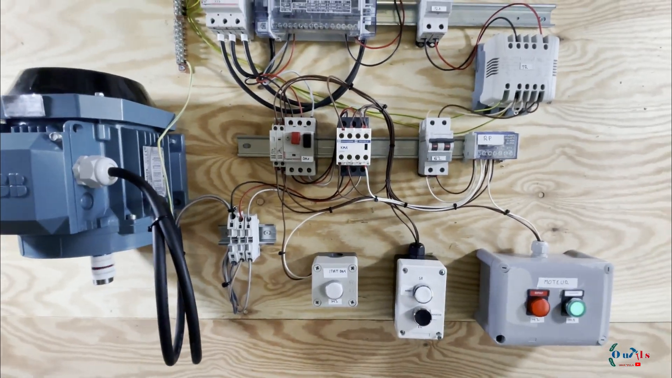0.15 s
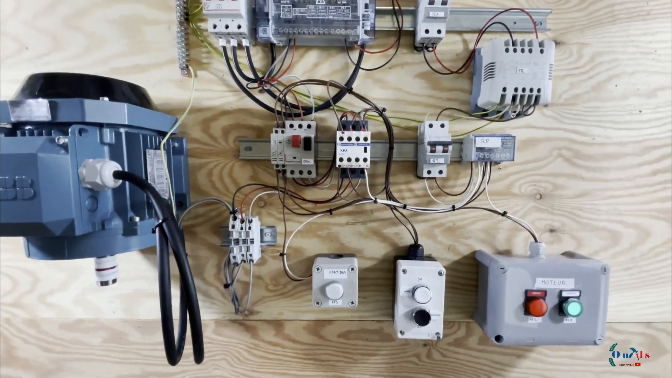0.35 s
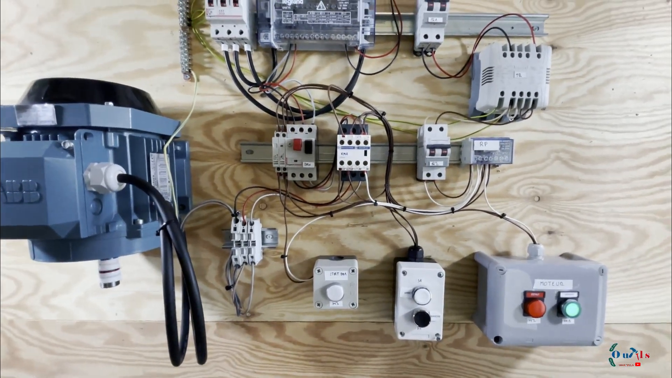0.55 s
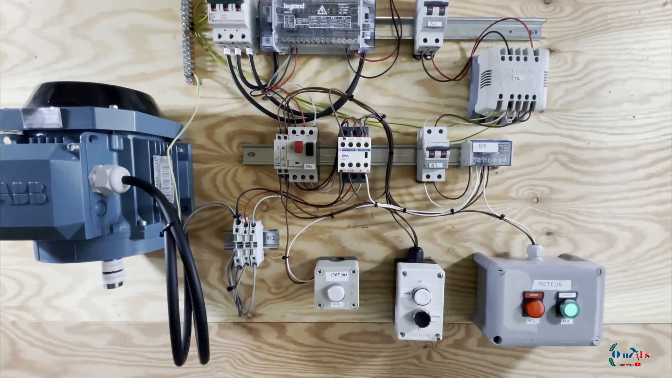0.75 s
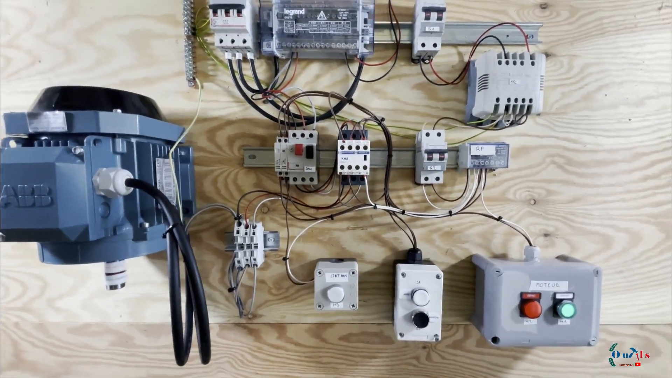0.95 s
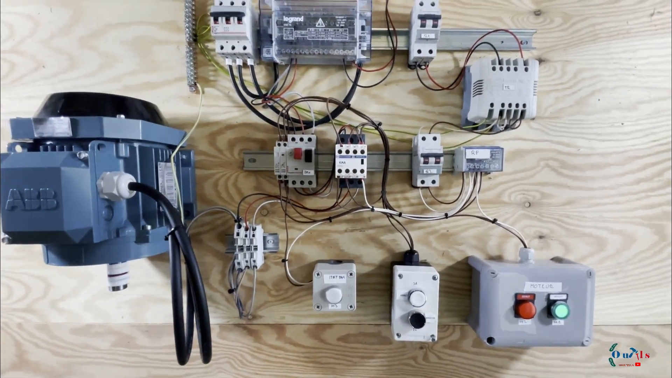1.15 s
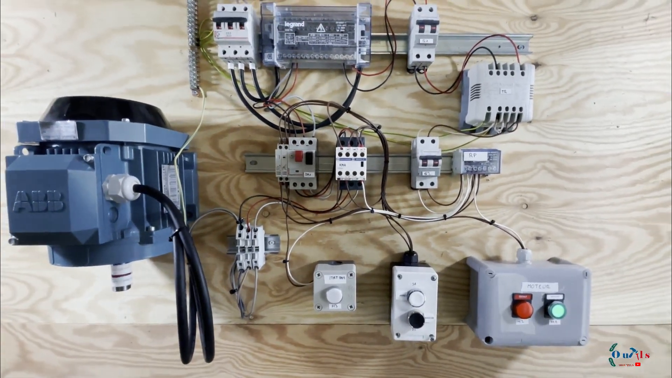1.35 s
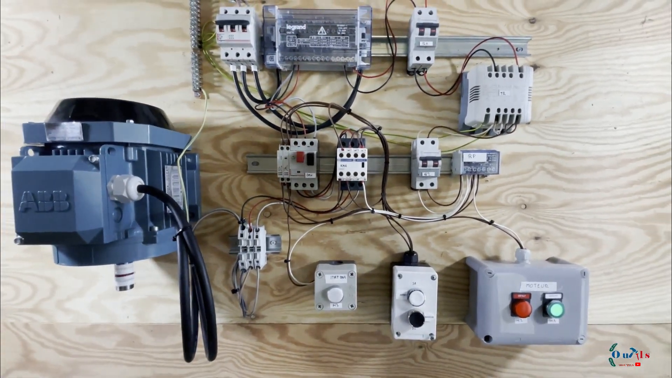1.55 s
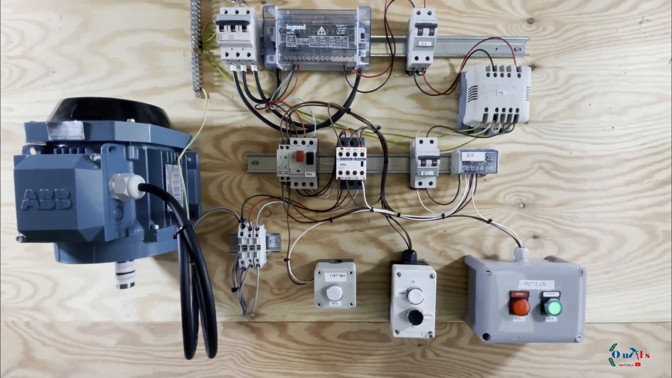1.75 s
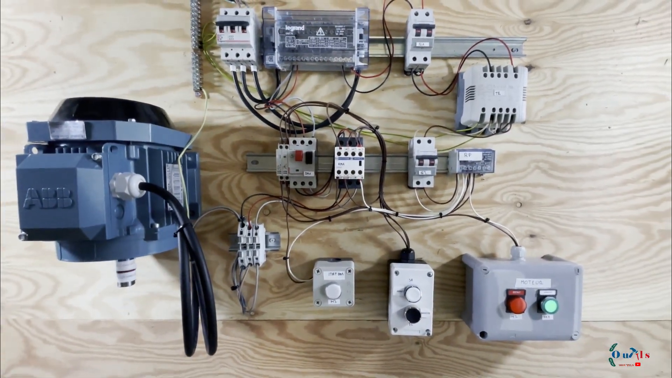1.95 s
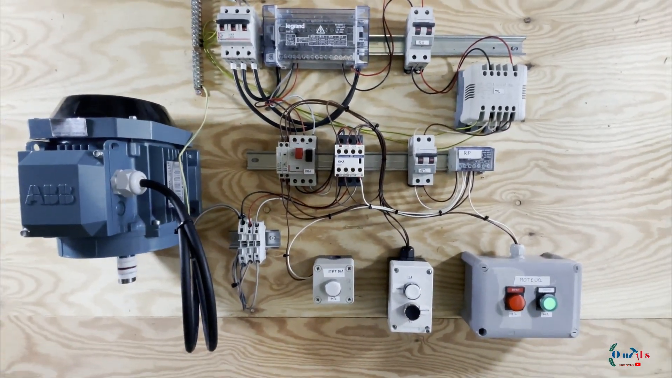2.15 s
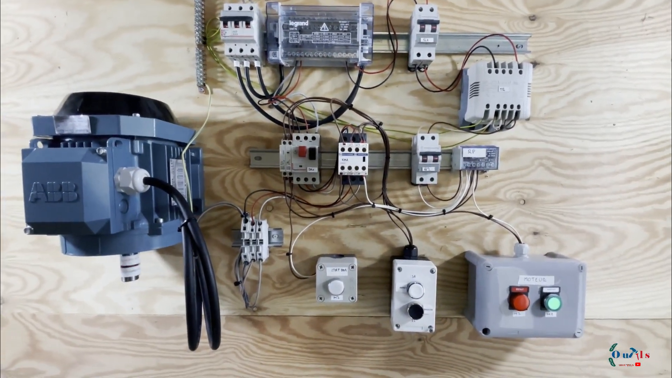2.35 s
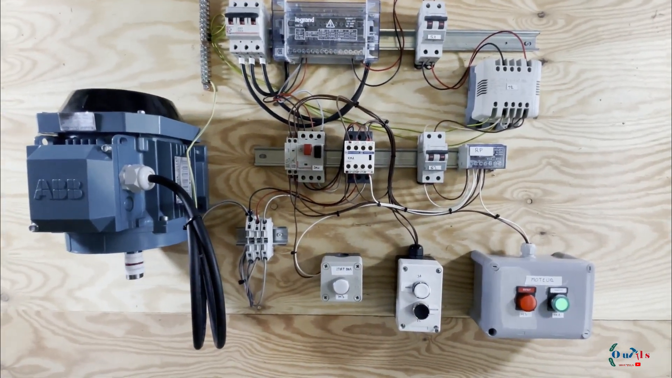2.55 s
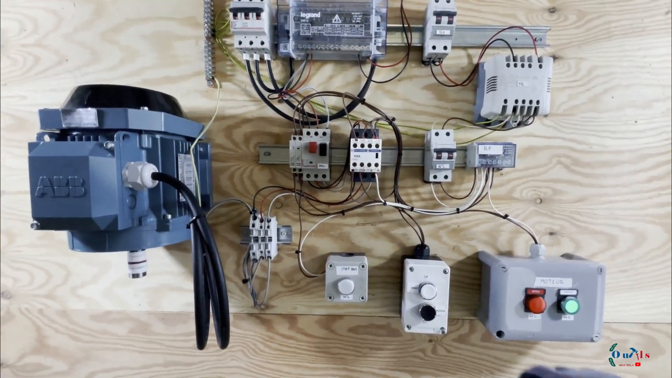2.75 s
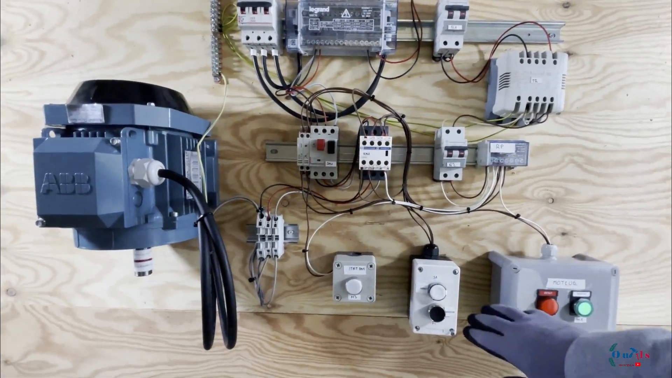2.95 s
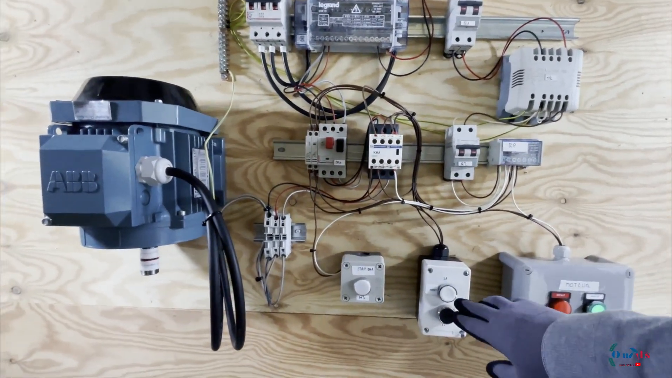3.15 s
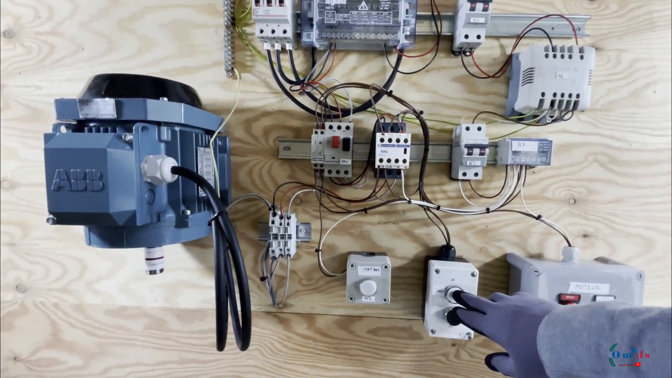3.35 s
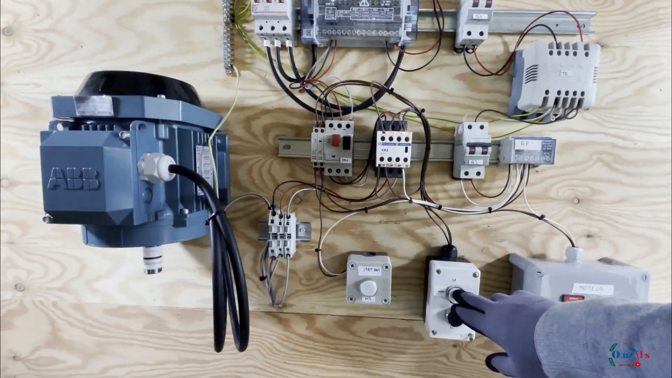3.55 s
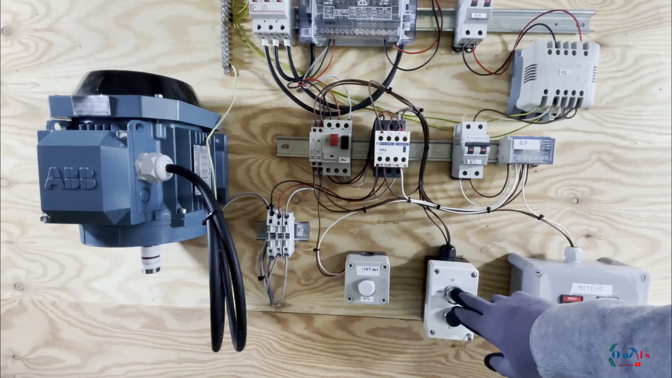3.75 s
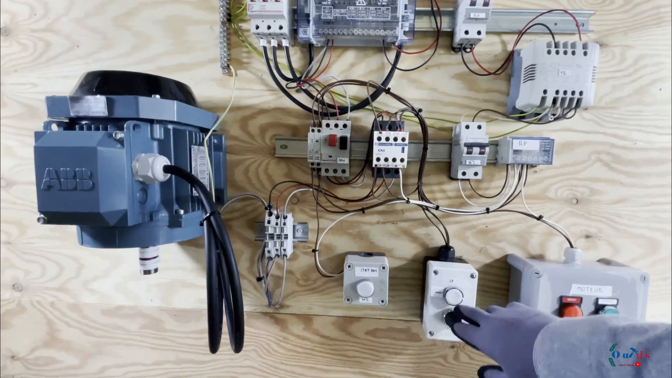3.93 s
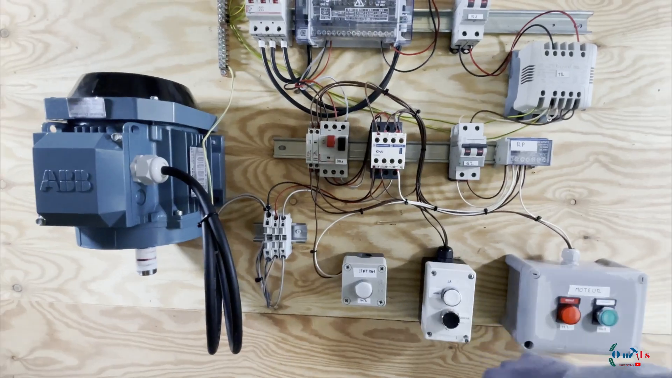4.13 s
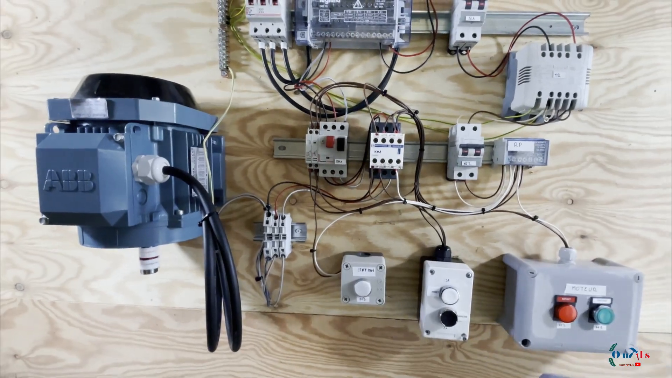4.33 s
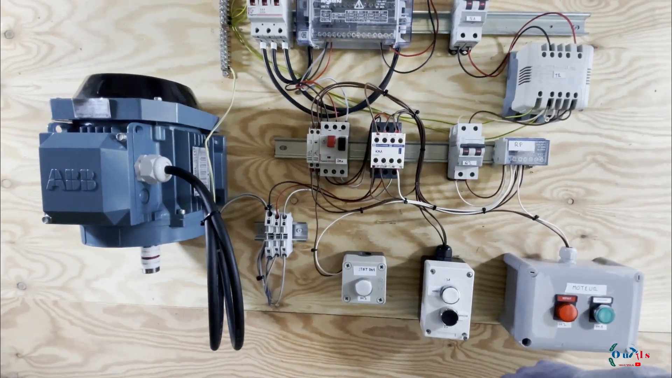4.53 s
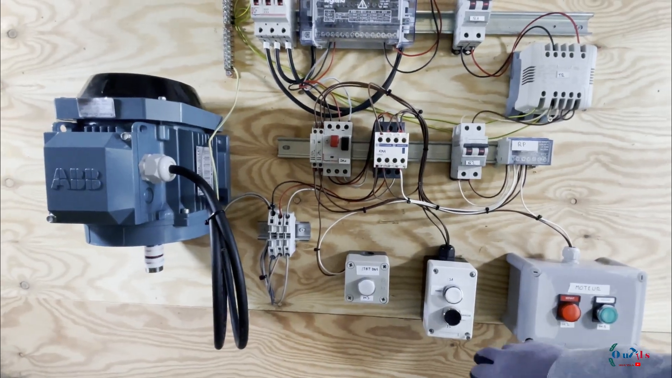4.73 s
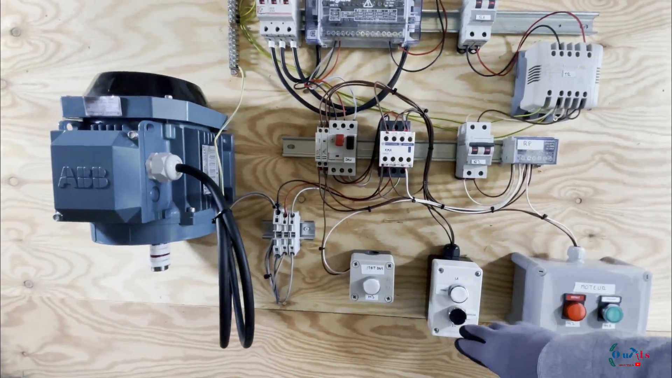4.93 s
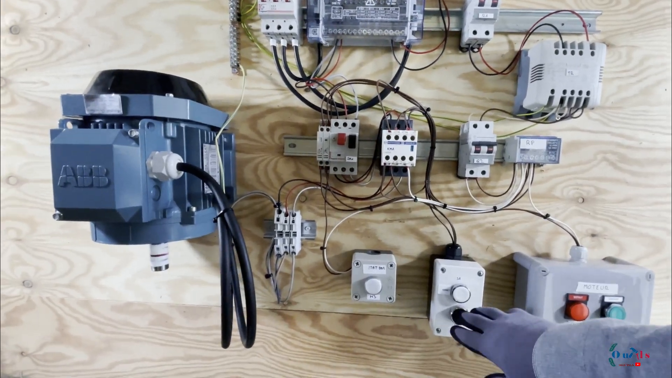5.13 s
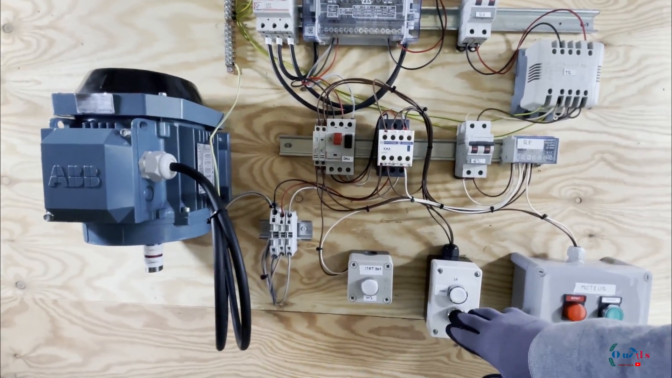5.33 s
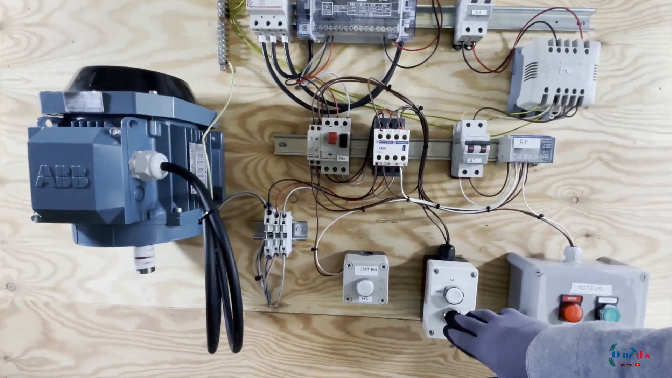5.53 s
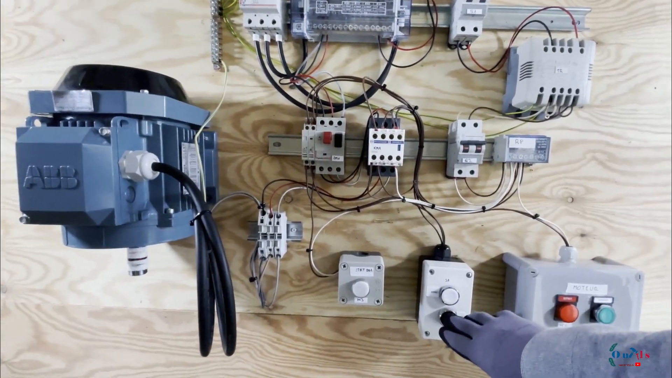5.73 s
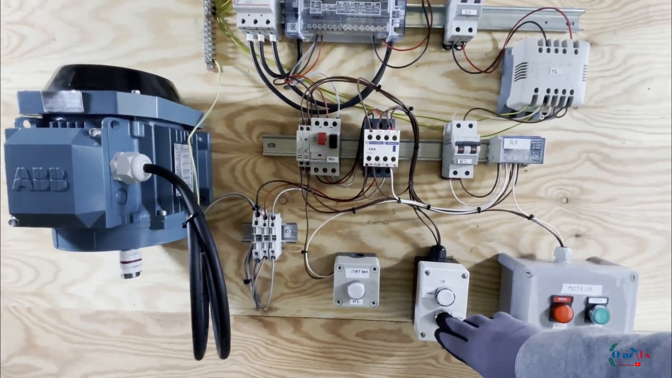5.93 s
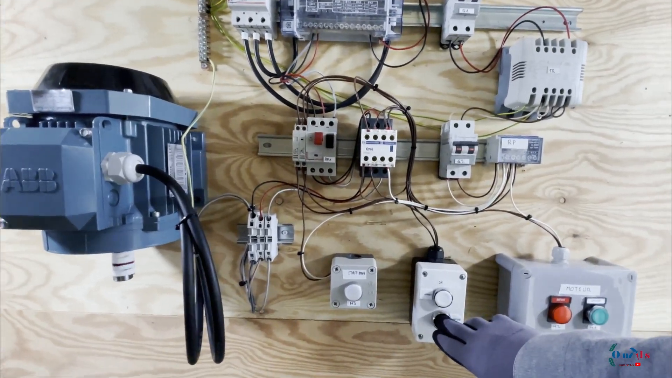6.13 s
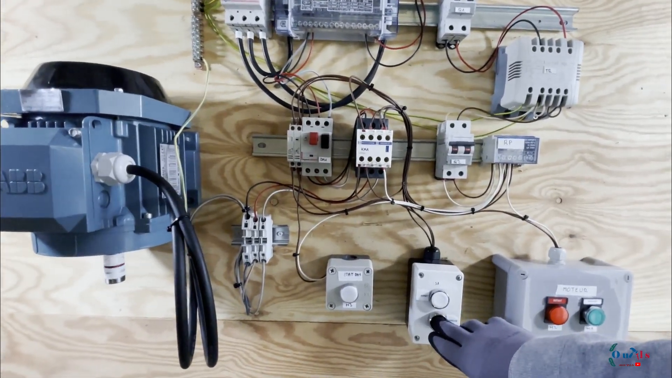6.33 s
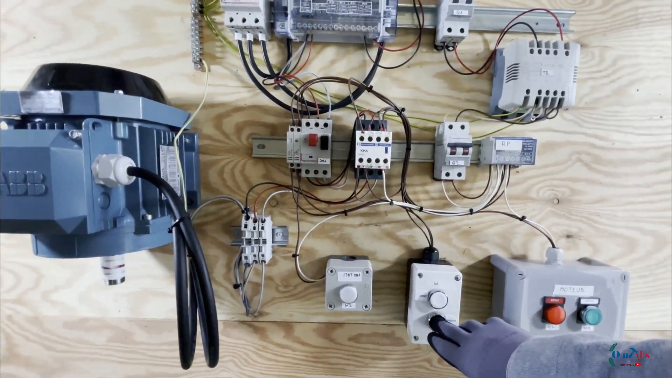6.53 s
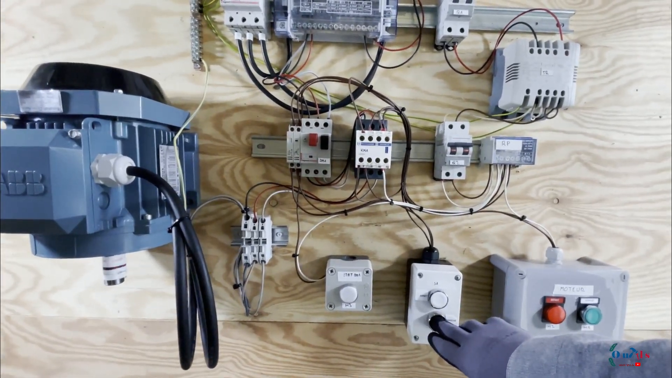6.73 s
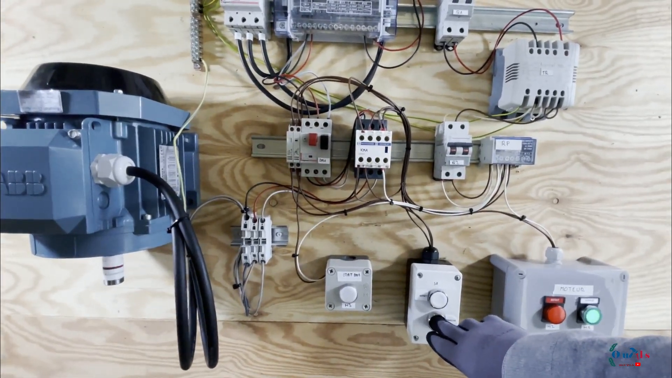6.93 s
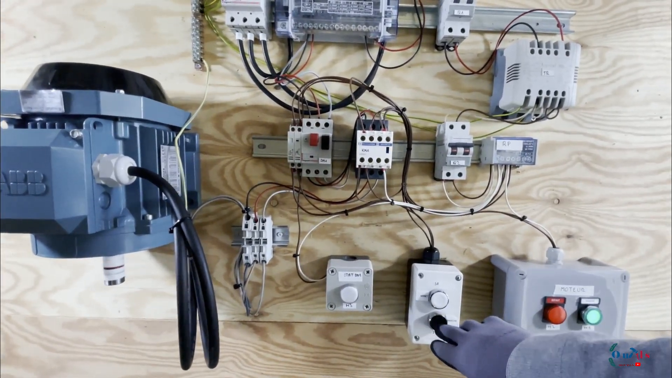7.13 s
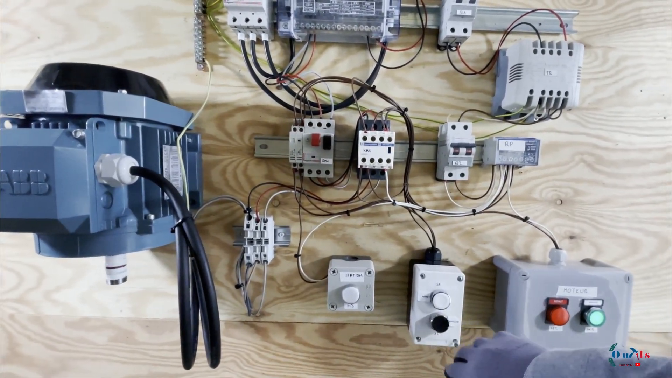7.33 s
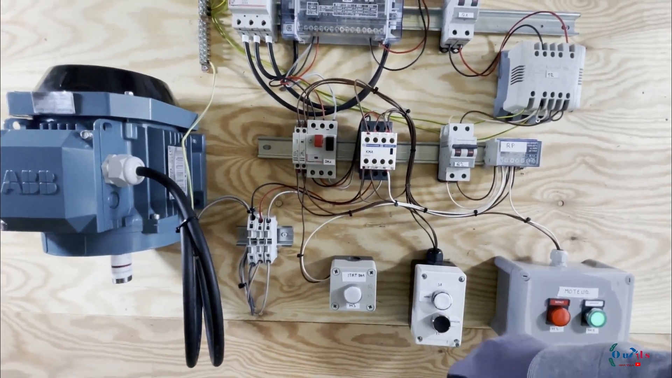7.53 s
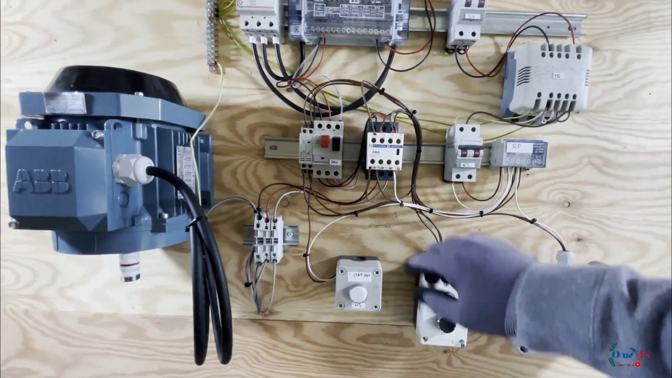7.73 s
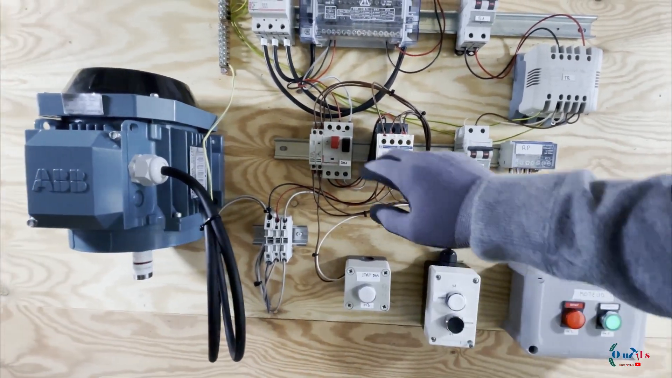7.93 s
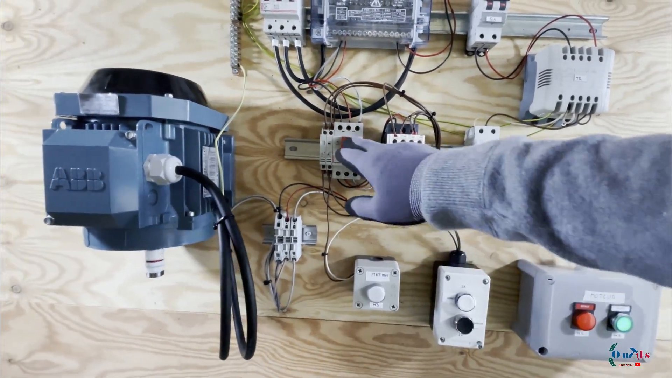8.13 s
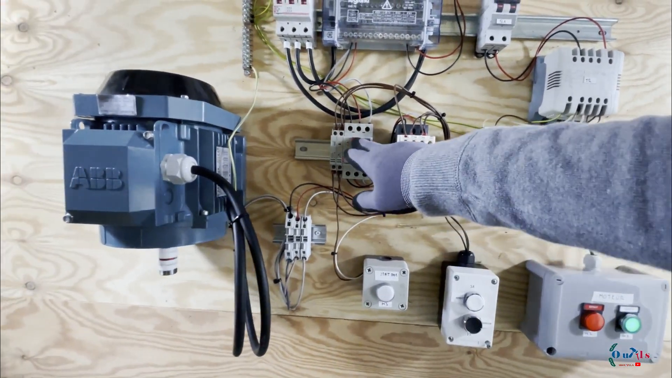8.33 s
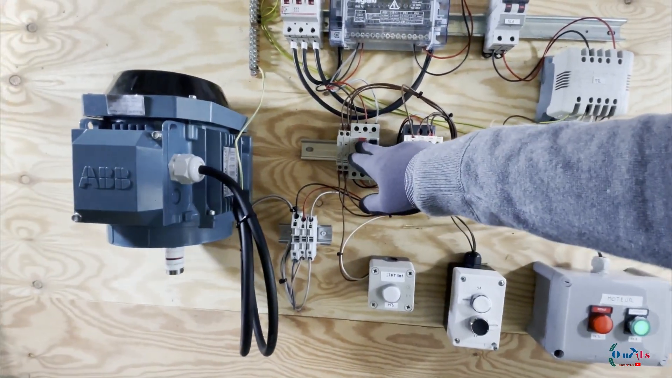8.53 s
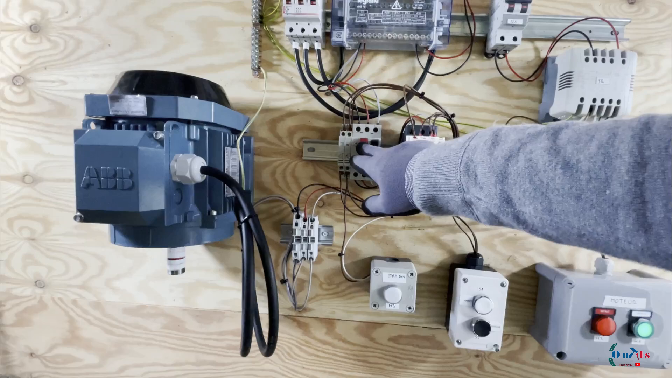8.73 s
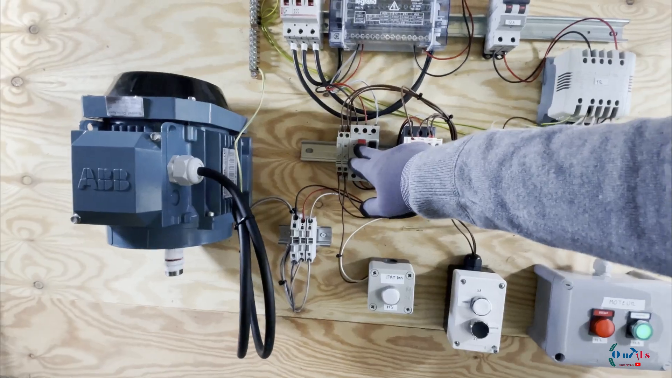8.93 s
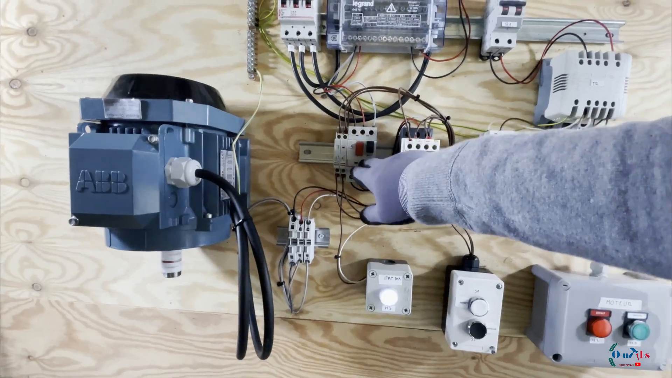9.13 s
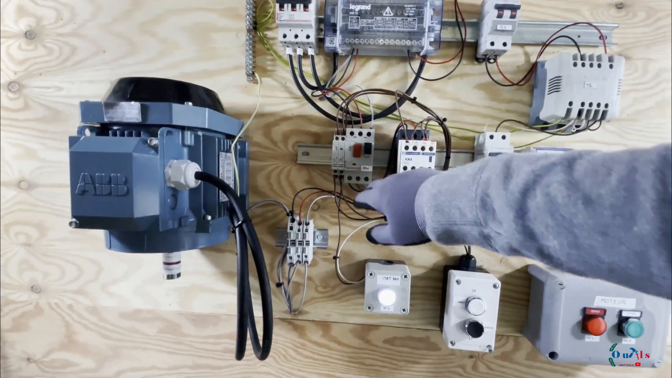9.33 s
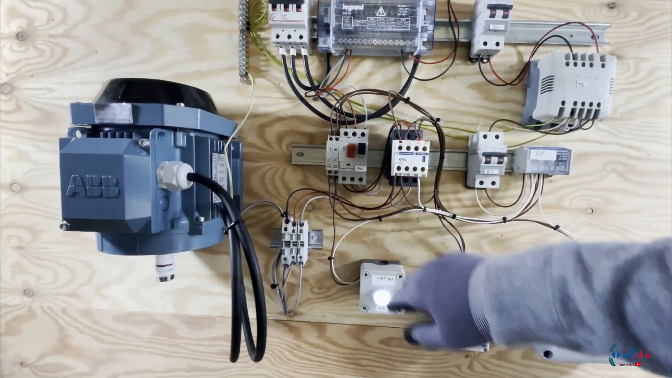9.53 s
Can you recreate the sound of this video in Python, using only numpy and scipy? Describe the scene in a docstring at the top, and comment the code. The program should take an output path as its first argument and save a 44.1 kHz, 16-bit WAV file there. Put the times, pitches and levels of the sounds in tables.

```python
"""A four-pole induction motor runs on a plywood board, left of a two-port microphone held above it.
Mains and rotor slots sing while current flows, over the fan, the bearings and the shaking board.
At 3.7 s a contactor drops out and the workshop rings; the field collapses and the rotor coasts down.
Buttons tick and a sleeve brushes past. At 7 s the contactor closes, and the torque pulls the rotor
back to speed with a shudder that knocks the motor's feet. At 9.1 s the contactor drops out again."""
import sys
import numpy as np
from scipy import signal
from scipy.fft import rfft, irfft, next_fast_len
from scipy.io import wavfile
from scipy.ndimage import uniform_filter1d

SR = 44100
rng = np.random.default_rng(int(sys.argv[2]) if len(sys.argv) > 2 else 0)


def wav_out(sig):
    """Save sig, one row per channel (or a flat mono array), as 16-bit PCM at SR to the path in sys.argv[1]."""
    wavfile.write(sys.argv[1], SR, np.round(np.clip(np.atleast_2d(sig).T, -1, 1) * 32767).astype(np.int16))


N = 422478
TIME_S = np.arange(N) / SR

# Spells with the contactor closed: on_s, off_s, shake_db, sway_db, fan_db, whirr_db
POWERED_SPELLS = [(-4, 3.727, -43.5, -44, -34, -39.5), (7, 9.072, -37.5, -41.5, -34.5, -39)]
# Magnetic pull after switch-on: since_on_s, relative_strength
FIELD_CURVE = [(0, 0.78), (.015, 0.61), (.05, 0.16), (.18, 0.12), (.205, 0.73), (2, 1.085)]
# Mains and slot tones: pitch_hz
FIELD_TONES_HZ = [100.07, 200.1, 300.1, 749.2, 849.2, 874.2, 949.3, 1398.6, 1747.7, 1847.7, 3246.1, 3513.3,
                  4444.6]
# The same tones at unit pull: first_spell_db, second_spell_db, left_minus_right_db, left_lead_rad
FIELD_TONE_LEVELS = [(-36.5, -33.5, 1.5, 0.2), (-41, -40.5, 2, 0.74), (-41.5, -43, -3, 0.67),
                     (-41, -37.5, 5, 2.58), (-33, -29.5, -6.5, 1.69), (-43.5, -40, -0.5, 0.56),
                     (-46, -45.5, -10.5, 3.3), (-45, -42.5, 7.5, 3.14), (-45.5, -47, 7, 0.49),
                     (-40, -74, 4.5, 1.69), (-45, -58, 3, 1.24), (-59, -46, -3, 1.73),
                     (-53, -52.5, -7, 0.94)]
# Swell and fade of the tone at BUZZ_HZ: time_s, gain_db
BUZZ_CURVE = [(0, -6), (.8, 0.5), (2, 1.5), (2.8, 2.5), (3.1, -2), (3.7, -16)]
BUZZ_HZ = 1847.7

# Harmonics of the rotor's once-a-turn knock: shaft_multiple
KNOCK_ORDERS = [2, 3, 5, 6, 7, 9, 11, 13, 25, 26, 27, 28, 29, 31, 32, 33, 36, 37]
# Their strengths before weighting by speed and pull: level_db
KNOCK_LEVELS_DB = [-51, -47, -37, -48.5, -44.5, -47, -45.5, -62, -71, -47, -48.5, -53, -52, -50, -49, -53,
                   -53, -44]
# Bearing tones ahead of the housing resonance: shaft_multiple, level_db
BEARING_WHINES = [(77, -42), (85.5, -42), (90.5, -44.5), (104.0, -48), (125.5, -53)]
FULL_TURNS_PER_S, COAST_TURNS_PER_S2, RUN_UP_S = 24.975, 3.62, .27

# Coasting shake, sway, fan and whirr: levels at full speed, and powers of speed that scale the amplitudes
COAST_DB, COAST_EXPONENTS = [-38, -40, -38, -42.5], [0.47, 0.18, 2.27, 1.02]
# Bouts of shaking, with a rattle in the fan noise: start_s, shake_db, sway_db, fan_db, rise_s, hold_s, t60_s
SHAKE_BOUTS = [(3.705, -24.5, -40, -36, 0.021, 0.024, 0.44), (3.773, -33, -25.5, -55, 0.058, 0.024, 0.46),
               (4.297, -40, -50, -45, 0.16, 0.51, 0.35), (5.218, -34.5, -30.5, -48, 0.21, 0.17, 3.5),
               (6.944, -19, -34, -34.5, 0.019, 0.036, 1.1), (7.036, -10, -30, -31, 0.043, 0.098, 0.34),
               (7.191, -15.5, -21, -55, 0.024, .02, 0.096), (7.265, -31.5, -29, -64, 0.035, 0.4, 1.3),
               (8.75, -46, -34, -58, 0.035, .02, 0.45), (8.957, -28, -31.5, -60, 0.044, 0.018, 0.33),
               (9.062, -23.5, -22.5, -32.5, 0.022, 0.014, 0.92)]
# Likeness of the motor noise at the two ports: frequency_hz, correlation
PORT_COHERENCE = [(60, 0.97), (130, 0.99), (300, 0.76), (700, 0), (2000, 0.66), (9000, 0)]
# Balance of the motor noise: frequency_hz, left_minus_right_db
PORT_BALANCE = [(60, 2), (110, 1), (200, 1), (380, -1), (700, 10), (1290, 4.5), (2380, 2), (4400, 10.5),
                (8120, 4), (15000, -7.5)]
MOTOR_LAG_SAMPLES, IMPACT_LAG_SAMPLES = 13, 3  # the right port hears later
# Shaking modes of the board: centre_hz, width_hz, relative_db
BOARD_MODES = [(97, 69, -2.5), (127.6, 81, -3.5), (192, 44, -16), (271, 200, -17)]
# Its deep swaying modes: centre_hz, width_hz, relative_db
SWAY_MODES = [(52, 42, -3), (66, 14, 1)]
# Spectral density of the fan's rush: frequency_hz, relative_db
FAN_SPECTRUM = [(150, -12.5), (250, -7.5), (305, -3.5), (361, -8), (521, -11.5), (600, -10), (680, -6.5),
                (776, -7.5), (851, -7), (1070, -13), (1640, -7), (1800, -15.5), (2410, -14.5), (3320, -15),
                (6720, -23), (8990, -30.5), (9700, -57), (12600, -64), (21300, -120)]
# Sheen of the fan cowl: centre_hz, width_hz, relative_db
COWL_MODES = [(8790, 890, -19)]
# Resonances in the bearing whirr: centre_hz, width_hz, relative_db
BEARING_MODES = [(750, 310, -15), (1426, 110, 6), (1848, 190, 12.5), (2098, 195, 9), (3390, 230, 4.5),
                 (3920, 480, 4.5), (6000, 300, -15), (9260, 260, -5.5)]

# Armature blows: time_s, level_db, frame_db, core_db, contacts_db, rise_s, t60_s, thud_db,
# left_minus_right_db, room_db
ARMATURE_BLOWS = [(3.7241, -16, 2.5, 12.5, 9, 0.004, 0.025, -21, 11, -9),
                  (3.7301, -16.5, 12.5, 0, -11, 0.002, 0.018, -8, -4, -0.5),
                  (6.97, -11, -8, 7.5, 0, 0.0065, 0.027, -23, 5, -5.5),
                  (6.975, -12, -3, -6, -7, 0.0021, 0.038, -10, -1, 2.5),
                  (9.063, -31, -10, -2, 5, 0.007, 0.03, -40, 4, -6),
                  (9.068, -14, 6, -23, 7, 0.006, 0.036, -16, 3, -4.5),
                  (9.0867, -13, 6, -6, -19, 0.0011, 0.017, -17, 2, 2),
                  (9.0935, -26.5, 6, -1, -15, 0.003, 0.056, -26, 5, 3)]
# One list each for plastic frame, iron core and contacts: centre_hz, width_hz, gain_db
CONTACTOR_MODES = ([(840, 600, -29), (1980, 410, 0), (2570, 590, -2.5), (3800, 1500, 0.5)],
                   [(5050, 950, -3.5), (5690, 970, 3.5)], [(6840, 2700, 7), (8930, 960, 5),
                   (11300, 260, -6.5), (15000, 1800, -32)])
THUD_HZ, THUD_T60_S, FRAME_TO_ROOM_DB = 137, 0.089, -7  # the frame's knock goes mostly into the board
# Reverberation time of the workshop: frequency_hz, t60_s
WORKSHOP_DECAY = [(100, 0.2), (1000, 0.59), (3000, 0.59), (7000, 0.51), (9500, 0.36), (12000, 0.35)]
# Swings of the board as the torque lurches or lets go: start_s, peak_db, pitch_hz, rise_s, t60_s
TORQUE_JOLTS = [(3.7478, -24, 121, .006, 0.11), (3.7682, -12.5, 113, 0.014, 0.26),
                (6.977, -10.5, 128, 0.0035, .1), (6.965, -15, 244, 0.0098, 0.1),
                (7.085, -18, 377, .016, 0.059), (7.061, -16, 128, 0.021, 0.083),
                (7.09, -12, 206, 0.0136, 0.12), (7.114, -5, 116.6, 0.026, 0.143),
                (7.135, -13.5, 269.2, 0.024, 0.29), (7.155, -6.5, 86, 0.028, 0.16),
                (7.188, -14, 101, 0.022, 0.096), (7.225, -5.5, 139, 0.022, 0.065),
                (9.071, -22.5, 232, 0.013, 0.073), (9.088, -26.5, 409, 0.0065, 0.14),
                (9.095, -13.5, 135.3, 0.019, 0.32)]
# Ticks, knocks and short rings, plus brief swells of bearing whine near 1.8 kHz while coasting:
# time_s, level_db, centre_hz, width_ratio, t60_s, left_minus_right_db
TICKS_AND_WHINES = [(3.913, -12.5, 4300, .13, 0.021, -4), (3.929, -14, 3000, 0.77, 0.01, 0),
                    (3.932, -16, 2600, 0.7, 0.015, -6), (3.934, -28, 4500, .2, .02, 0),
                    (4.7, -32, 1830, .04, 0.87, 1), (4.96, -31, 1853, .04, 0.4, -2),
                    (5.9504, -38, 3830, 0.56, 0.031, 21), (6.483, -24, 3780, 0.45, 0.021, 3),
                    (6.5, -31.5, 1800, .06, 0.92, 0), (6.87, -24, 3330, .5, 0.03, 3),
                    (6.972, -2.5, 7620, 0.036, 0.047, 1), (6.98, -15, 5930, .06, 0.19, 2),
                    (7.005, -21, 5440, 0.044, 0.072, 0), (7.0, -21, 4740, 0.075, .12, 6),
                    (6.993, -7, 840, 0.25, 0.093, 10), (7.097, -2, 850, 0.5, 0.035, 2),
                    (7.106, 2, 560, 0.3, 0.04, 6), (7.11, -14, 4320, 1, 0.09, 1),
                    (7.129, 0, 724, .3, 0.0505, -6), (7.14, -8, 1000, .3, 0.0395, -6),
                    (7.1523, -12.5, 7050, 0.96, 0.034, -3), (7.17, -13, 6900, 0.79, 0.019, 9)]


def undb(db):
    """Amplitude ratio of a level in decibels."""
    return np.exp(np.asarray(db) * (np.log(10) / 20))


def over_hz(table, hz):
    """Interpolation on a logarithmic frequency axis."""
    frequencies, values = np.transpose(table)
    return np.interp(np.log(np.maximum(hz, 1)), np.log(frequencies), values)


def resonances(modes, hz):
    """Incoherent modes add in power: the gain of their summed humps."""
    return np.sqrt(sum(undb(db) ** 2 / (1 + (2 * (hz - centre) / width) ** 2) ** 1.54
                       for centre, width, db in modes))


def ring(x, hz, width_hz):
    """A second-order resonator with unit gain at its centre."""
    return signal.lfilter(*signal.iirpeak(hz, hz / width_hz, fs=SR), x)


def ring_twice(x, hz, width_hz):
    """Two like resonators in cascade give steeper skirts."""
    return ring(ring(x, hz, width_hz), hz, width_hz)


def walk(rate_hz):
    """Smooth random modulation with a spread near 1."""
    steps = uniform_filter1d(np.repeat(rng.standard_normal(int(N / SR * rate_hz) + 2), 4), size=4)
    return np.interp(TIME_S * 4 * rate_hz, np.arange(len(steps)), steps)


def swell(t, rise, t60):
    """Envelope of a damped vibration: a smooth rise, then exponential decay."""
    return np.sin(np.pi / 2 * np.minimum(t / rise, 1)) ** 4 * 1000 ** (-np.maximum(t - rise, 0) / t60)


def burst(t, rise, t60):
    """Transient noise, partly coherent between the ports."""
    noise = rng.standard_normal((3, len(t)))
    return (.6 * noise[0] + .4 * noise[1:]) * swell(t, rise, t60)


def place(out, start_s, sound, pan_db=0):
    """Differences of arrival time and level between the ports give a sound its direction."""
    for port, lag, db in ((0, 0, pan_db / 2), (1, IMPACT_LAG_SAMPLES, -pan_db / 2)):
        start = int(start_s * SR) + lag
        out[port, start:start + sound.shape[1]] += sound[port] * undb(db)


def powered(on_s, off_s, collapse_s=0.041):
    """The field exists while the contactor is closed and collapses soon after it opens."""
    return (TIME_S >= on_s) * np.clip(1 - (TIME_S - off_s) / collapse_s, 0, 1)


def magnetic_pull():
    """Magnetic force follows the current: a surge at switch-on, a lull in the run-up, then steady."""
    return sum(powered(on, off) * np.interp(TIME_S - on, *np.transpose(FIELD_CURVE))
               for on, off, *_ in POWERED_SPELLS)


def shaft_speed():
    """Turns per second: uniform deceleration while coasting, a linear recovery in the run-up."""
    restarts, lost = [spell[0] for spell in POWERED_SPELLS[1:]] + [np.inf], 0
    for (_, off, *_), restart in zip(POWERED_SPELLS, restarts):
        coasted_s = np.maximum(np.minimum(TIME_S, restart) - off, 0)
        lost = lost + COAST_TURNS_PER_S2 * coasted_s * np.clip(1 - (TIME_S - restart) / RUN_UP_S, 0, 1)
    return FULL_TURNS_PER_S - lost


def noise_gains():
    """Gains of shake, sway, fan and whirr follow power laws of speed; bouts of shaking add in power."""
    gates = [powered(on, off) for on, off, *_ in POWERED_SPELLS]
    running = sum(gate * undb(spell[2:])[:, None] for gate, spell in zip(gates, POWERED_SPELLS))
    coasting = (1 - sum(gates)) * undb(COAST_DB)[:, None]
    slowing = (shaft_speed() / FULL_TURNS_PER_S) ** np.array(COAST_EXPONENTS)[:, None]
    power = ((running + coasting) * slowing) ** 2
    for start_s, *levels_db, rise, hold, t60 in SHAKE_BOUTS:
        since = np.maximum(TIME_S - start_s, 0)
        envelope = swell(since - np.clip(since - rise, 0, hold), rise, t60)
        power[:3] += (undb(levels_db)[:, None] * envelope) ** 2
    return np.sqrt(power)


def motor_noise(gain_of_hz):
    """Partial coherence: coloured noise, alike at both ports in the bass and less so higher up."""
    size = next_fast_len(N)
    hz = np.arange(size // 2 + 1) * SR / size
    left, independent = rfft(rng.standard_normal((2, size)))
    likeness = np.clip(over_hz(PORT_COHERENCE, hz), 0, 1)
    delay = np.exp(-2j * np.pi * hz * MOTOR_LAG_SAMPLES / SR)
    right = likeness * left * delay + np.sqrt(1 - likeness ** 2) * independent
    pan = undb(over_hz(PORT_BALANCE, hz) / 2)
    out = irfft(np.array([left * pan, right / pan]) * gain_of_hz(hz), size)[:, :N]
    return out / np.sqrt(np.mean(out.mean(axis=0) ** 2))


def magnetic_tones():
    """Forced vibration: the field drives wavering mains and slot tones, which stop with the current."""
    out, restart_s = 0, POWERED_SPELLS[1][0]
    for hz, (first_db, second_db, pan_db, lead) in zip(FIELD_TONES_HZ, FIELD_TONE_LEVELS):
        db = np.where(TIME_S < restart_s, first_db, second_db) + 0.67 * walk(3.3) + 1.33 * walk(15)
        if hz == BUZZ_HZ:
            db = db + np.interp(TIME_S, *np.transpose(BUZZ_CURVE))
        phase = 2 * np.pi * hz * TIME_S + rng.uniform(0, 2 * np.pi) + .2 * walk(25)
        ports = np.array([undb(pan_db / 2) * np.sin(phase), undb(-pan_db / 2) * np.sin(phase - lead)])
        out = out + np.sqrt(2) * undb(db) * ports
    return out * magnetic_pull()


def rotor_tones(housing_hz=1790, housing_width_hz=130):
    """Shaft orders: the knock weakens with falling speed; whines slide through the housing resonance."""
    speed = shaft_speed()
    angle = 2 * np.pi * np.cumsum(speed) / SR

    def tone(order, db):
        amplitude = np.sqrt(2) * undb(db + 1.6 * walk(4.6) + 2.4 * walk(11))
        return amplitude * np.sin(order * angle + rng.uniform(0, 2 * np.pi))

    knock = sum(tone(order, db) for order, db in zip(KNOCK_ORDERS, KNOCK_LEVELS_DB))
    knock = knock * (speed / FULL_TURNS_PER_S) ** 3 * (0.17 + 0.54 * magnetic_pull())
    whine = ring_twice(sum(tone(order, db) for order, db in BEARING_WHINES), housing_hz, housing_width_hz)
    return np.array([knock + 1.1 * whine, np.roll(knock + 0.13 * whine, MOTOR_LAG_SAMPLES)])


def shaking_board(shake_gain, sway_gain, travel=.4, feet_gap=.22):
    """Contact nonlinearity: the board's travel is limited, and swings beyond a gap knock the feet."""
    shake = motor_noise(lambda hz: resonances(BOARD_MODES, hz)) * shake_gain * undb(2.2 * walk(11))
    sway = motor_noise(lambda hz: resonances(SWAY_MODES, hz)) * sway_gain * undb(0.49 * walk(4.3))
    swing = travel * np.tanh((shake + sway) / travel)
    feet = undb(-9) * ring(np.maximum(swing - feet_gap, 0), hz=500, width_hz=970)
    return swing + feet


def fan_and_bearings(fan_gain, whirr_gain, top_hz=9650):
    """Resonances colour broadband noise: the rush of the fan in its cowl and the whirr of the bearings."""
    rush = motor_noise(lambda hz: np.hypot(undb(over_hz(FAN_SPECTRUM, hz)), resonances(COWL_MODES, hz))
                       * (hz < top_hz))
    whirr = motor_noise(lambda hz: resonances(BEARING_MODES, hz) * (hz < top_hz))
    return rush * fan_gain * undb(0.74 * walk(11)) + whirr * whirr_gain * undb(walk(9))


def high_hiss(gain, centre_hz=11254, end_s=8.4):
    """Narrow-band noise: a faint hiss near 11 kHz flickers and fades out by 8.4 s."""
    hiss = motor_noise(lambda hz: np.exp(-((hz - centre_hz) / 300) ** 2))
    return hiss * gain * undb(-30.5 + 6.4 * walk(22)) * np.clip((end_s - TIME_S) / 0.41, 0, 1)


def faint_hum(pitch_hz=296, level_db=-55.5):
    """A pure tone with slight amplitude modulation sounds throughout."""
    return np.sqrt(2) * undb(level_db + walk(12)) * np.sin(2 * np.pi * pitch_hz * TIME_S)


def contactor():
    """Impact excites frame, core and contacts and thuds the board: direct sound, and clicks for the room."""
    (direct, clicks), t = np.zeros((2, 2, N)), np.arange(SR // 4) / SR
    for blow in ARMATURE_BLOWS:
        time_s, level_db, frame_db, core_db, contacts_db, rise, t60, thud_db, pan_db, room_db = blow
        rattle = undb(level_db) * burst(t, rise, t60)
        impulse = undb(level_db + room_db) * np.sqrt(np.sum(swell(t, rise, t60) ** 2) / 2) * (t == 0)
        drive = np.vstack([rattle, impulse, impulse])  # two rows for the ports, two for the room
        frame, core, contacts = (sum(undb(db) * ring(drive, hz, width) * np.sqrt(SR / width) * (-1) ** k
                                     for k, (hz, width, db) in enumerate(part))
                                 for part in CONTACTOR_MODES)
        frame = undb(frame_db) * frame
        metal = undb(core_db) * core + undb(contacts_db) * contacts
        thud = undb(thud_db) * np.sin(2 * np.pi * THUD_HZ * t) * 1000 ** (-t / THUD_T60_S)
        place(direct, time_s - 0.64 * rise, frame[:2] + thud, pan_db)
        place(direct, time_s - .7 * rise, metal[:2], pan_db)
        place(clicks, time_s, metal[2:] + undb(FRAME_TO_ROOM_DB) * frame[2:])
    return direct, clicks


def workshop(sound, level_db=-8.5, top_hz=12200):
    """Diffuse reverberation: third octaves decay exponentially; the tail is cut steeply above 12 kHz."""
    t, tail = np.arange(SR) / SR, 0
    for hz in 125 * 2. ** np.arange(0, 6.7, 1 / 3):
        band = ring_twice(rng.standard_normal((2, SR)), hz, .4 * hz)
        tail = tail + band * 1000 ** (-t / over_hz(WORKSHOP_DECAY, hz))
    tail = tail * (1 - np.exp(-t / 0.00064))
    tail = signal.sosfilt(signal.cheby1(10, 1, top_hz, fs=SR, output="sos"), tail)
    tail = tail / np.sqrt(np.sum(tail ** 2) / 2)
    return undb(level_db) * signal.fftconvolve(sound[:1], tail, axes=1)[:, :N]


def torque_jolts():
    """Transient response: each lurch of the torque sets the board into a damped oscillation."""
    out, t = np.zeros((2, N)), np.arange(SR // 3) / SR
    for start_s, peak_db, hz, rise, t60 in TORQUE_JOLTS:
        swing = undb(peak_db) * swell(t, rise, t60) * np.sin(2 * np.pi * hz * t)
        place(out, start_s, np.array([swing, swing]))
    return out


def ticks_and_whines(top_hz=9500):
    """Noise-driven resonance: short bursts tick, knock or ring; longer ones swell as whines near 1.8 kHz."""
    out, t = np.zeros((2, N)), np.arange(SR // 2) / SR
    for time_s, level_db, hz, width_ratio, t60, pan_db in TICKS_AND_WHINES:
        rise = .16 * t60
        band = ring_twice(burst(t, rise, t60), hz, width_ratio * hz)
        place(out, time_s - rise / 2, undb(level_db) / np.sqrt(width_ratio) * band, pan_db)
    return signal.sosfilt(signal.butter(8, top_hz, fs=SR, output="sos"), out)


def sleeve(time_s=5.42, half_length_s=.07, centre_hz=1500, level_db=-44):
    """Friction noise: a broad band swells and fades as a sleeve brushes past."""
    brush = ring_twice(rng.standard_normal((2, N)), centre_hz, centre_hz)
    envelope = np.exp(-((TIME_S - time_s) / half_length_s) ** 2)
    return undb(level_db) * envelope * brush / np.sqrt(np.mean(brush ** 2))


def scene():
    """Superposition of all sources; only contactor, ticks, brief whines and sleeve excite the room."""
    blows, clicks = contactor()
    small_sounds = ticks_and_whines() + sleeve()
    shake, sway, fan, whirr = noise_gains()
    motor = magnetic_tones() + rotor_tones() + shaking_board(shake, sway) + fan_and_bearings(fan, whirr)
    background = high_hiss(gain=fan) + faint_hum()
    return motor + background + blows + torque_jolts() + small_sounds + workshop(clicks + small_sounds)


def record(dry, low_hz=41.4, top_hz=16300):
    """Band limiting and clipping: the microphone drops deep bass, flattens at full scale, cuts the top."""
    thinned = signal.sosfilt(signal.butter(5, low_hz, "high", fs=SR, output="sos"), dry)
    return signal.sosfilt(signal.ellip(8, .2, 60, top_hz, fs=SR, output="sos"), np.clip(thinned, -1, 1))


dry = scene()
out = record(dry)
wav_out(out)
```